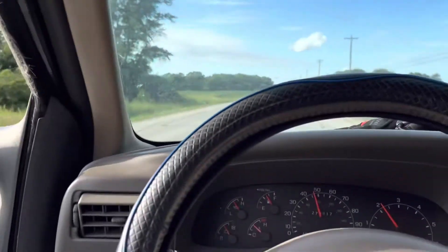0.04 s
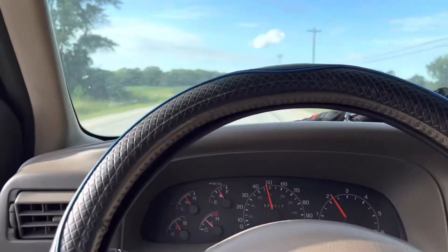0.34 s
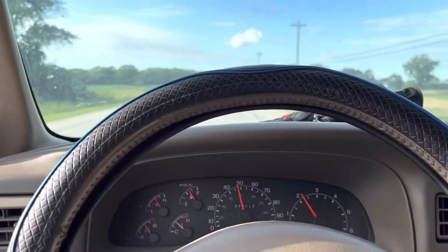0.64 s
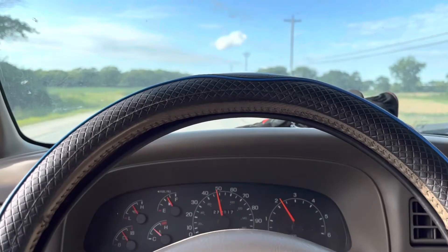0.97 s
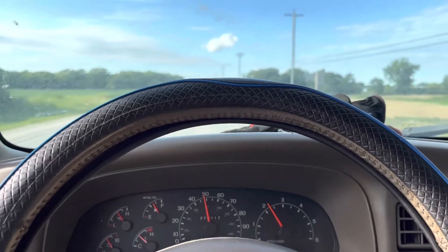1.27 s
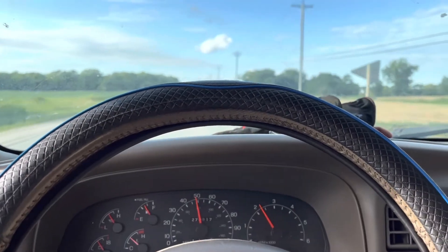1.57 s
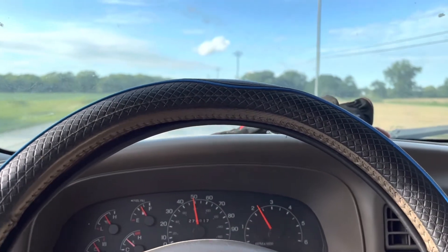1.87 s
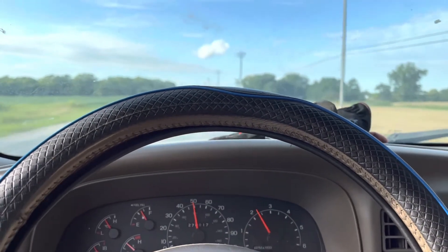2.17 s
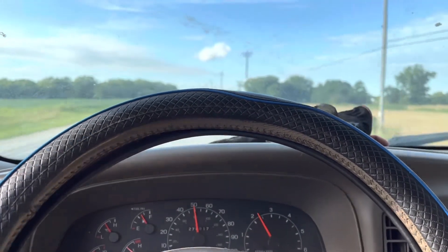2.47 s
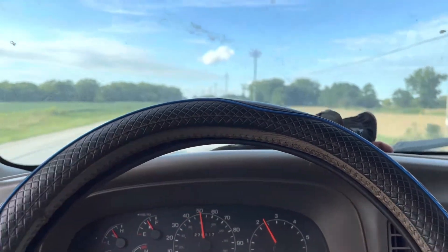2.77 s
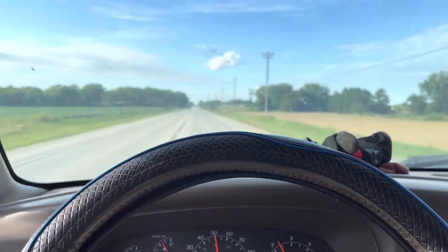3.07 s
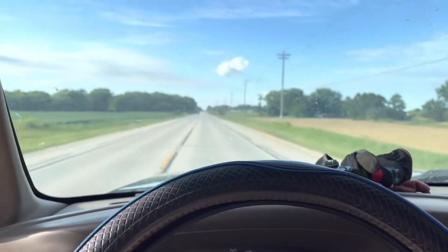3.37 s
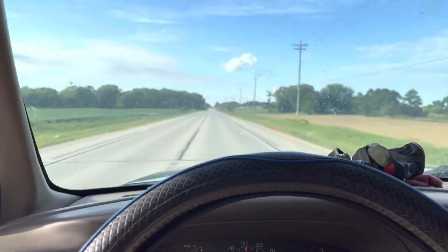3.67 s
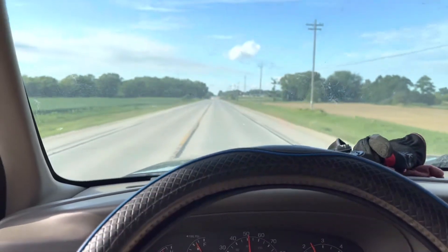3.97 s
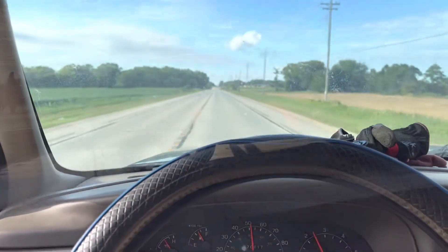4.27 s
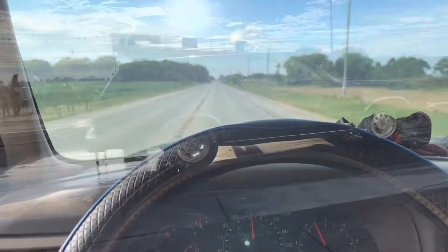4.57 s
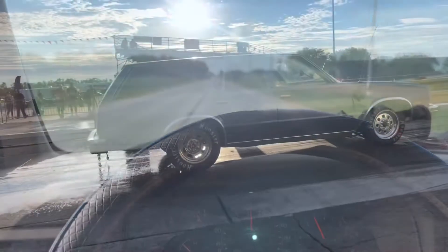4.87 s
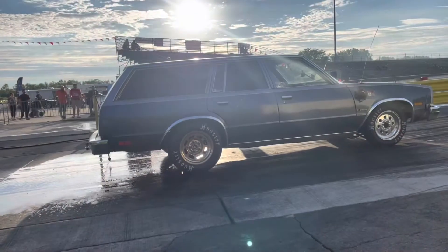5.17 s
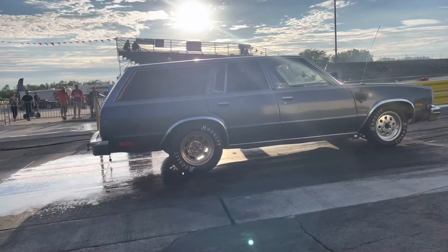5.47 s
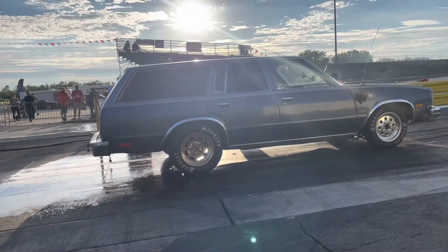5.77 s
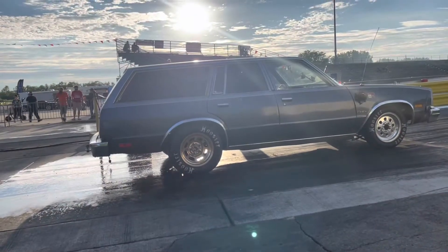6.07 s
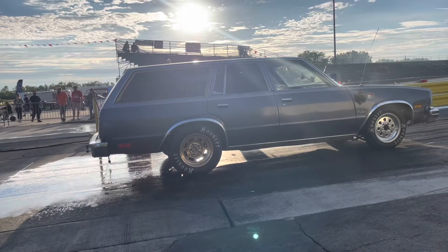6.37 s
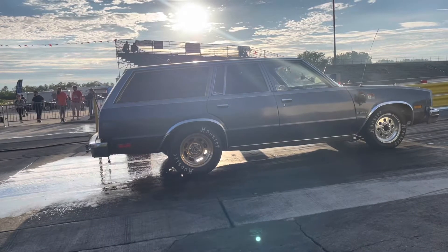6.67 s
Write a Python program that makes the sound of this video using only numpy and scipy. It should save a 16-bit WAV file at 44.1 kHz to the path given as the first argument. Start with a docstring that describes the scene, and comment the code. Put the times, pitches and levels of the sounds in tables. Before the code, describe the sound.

Inside a moving pickup, a diesel V8 drones and knocks, slowly gathering speed over road rumble, tyre roar, buzzing panels and light wind hiss. Past halfway it cross-fades to an outdoor drag strip, close beside a turbocharged V8 wagon held on its brakes. The exhaust lopes and rasps, fires a quick run of hard pops, and the turbo whistles upward in a bright hiss of air.

```python
"""Inside the cab of a pickup: the diesel V8 drones, knocks and slowly gathers speed over road rumble,
buzzing panels and wind at the glass. Cross-fade to a drag strip, microphone on a turbocharged V8 wagon
building boost against its brakes. Uneven surges ring its tailpipe into a loping bark and rasp,
unburnt fuel goes off in a run of hard pops, and the turbo whistles upward in a bright hiss of air."""
import sys
import numpy as np
from scipy import signal
from scipy.fft import rfft, irfft, next_fast_len
from scipy.io import wavfile

SR = 44100
rng = np.random.default_rng(int(sys.argv[2]) if len(sys.argv) > 2 else 0)


def transcribe(u):
    """Save the signal u as a 16-bit wav file named by the first command-line argument.

    u: samples, shape (n,) or (channels, n), limited to [-1, 1]; the rate is SR.
    q: integer samples, one column per channel.
    """
    v = np.clip(np.atleast_2d(u).T, -1, 1)
    q = np.round(v * 32767).astype(np.int16)
    wavfile.write(sys.argv[1], SR, q)


N = 301203
TIME = np.arange(N) / SR

# In the cab. Levels in all tables are relative; an order is a multiple of the four-stroke cycle rate.
# the pickup's weaker engine lines: order, level/dB at low revs, level/dB at high revs
TRUCK_ORDERS = [(6, -27.5, -30), (9, -35.5, -32), (11, -49, -28), (19, -54, -39), (23, -40, -38),
                (24, -40, -36), (27, -32.5, -48), (29, -33, -44), (32, -49, -26), (42, -52, -43),
                (43, -41, -50), (44, -52, -43), (50, -50, -45)]
# engine block resonances: f/Hz, width/Hz, level/dB
BLOCK_MODES = [(994, 15, 12.5), (1295, 33, 10), (1847, 29, 2), (2300, 36, 4), (2650, 69, -7)]
# cab panel resonances: f/Hz, width/Hz, level/dB
PANEL_MODES = [(295.4, 37, -31.5), (508, 53, -40), (761, 17, -38.5), (987, 15, -57.5)]
# body rumble: f/Hz, level/dB
RUMBLE_SPECTRUM = [(25, -31), (32, -9), (42, -4.5), (58, -3), (72, -11.5), (115, -7), (150, -11.5),
                   (200, -15.5), (260, -23.5)]
# the rumble swelling on rough patches of road: t/s, level/dB
ROUGH_ROAD = [(2.3, -1), (2.55, 2), (3.0, 0.5), (3.55, 0), (3.77, 3), (3.95, 0.5), (4.35, -0.5), (4.7, -1)]
# tyres, heard from inside: f/Hz, level/dB
TYRE_SPECTRUM = [(170, -18), (240, -13), (295, -1.5), (370, -10), (450, -8), (560, -8), (680, -10.5),
                 (950, -9), (1150, -12.5), (1400, -15), (1900, -20.5), (2600, -70)]
# wind at the glass: f/Hz, level/dB
WIND_SPECTRUM = [(1400, -22), (2200, 1.5), (3000, -3.5), (4400, -7.5), (5200, -7), (7000, -13),
                 (9000, -31.5), (11500, -14), (14000, -27.5), (15500, -20)]
# how alike left and right are in the cab: f/Hz, likeness (-1 to 1)
CAB_LIKENESS = [(60, 0.97), (130, 0.99), (280, 0.22), (600, -0.19), (1250, -0.99), (2700, 0.78),
                (6000, -0.29), (13000, 0.78)]

# At the strip. The wagon's engine speed: t/s, speed/rpm
RACER_RPM = [(4.5, 1861.5), (4.95, 2080.0), (5.15, 2225.0), (5.45, 2344.0), (5.8, 2417.0), (6.15, 2484.0),
             (6.4, 2588.0), (6.6, 2645.0), (6.83, 2690.0)]
ORDER_RPM, RASP_RPM = (2000, 2245, 2420, 2650), (2260, 2350, 2500)
# exhaust lines: order, then level/dB at each speed of ORDER_RPM
EXHAUST_ORDERS = [(3, -38, -40, -30, -23), (4, -35, -39, -39, -30), (5, -10, -10, -11, -11),
                  (6, -28, -30, -28, -29), (7, -25, -23, -20, -21), (8, -15.5, -17, -18, -17),
                  (9, -25, -24, -22, -20), (10, -24, -26, -25.5, -23), (11, -22, -26, -28, -40),
                  (12, -25, -26, -25, -23), (13, -26, -26, -27, -25), (14, -32, -34, -29.5, -31),
                  (15, -25, -33, -32, -40), (16, -33, -41, -40, -38), (17, -29, -40, -33, -33),
                  (18, -22.5, -24.5, -24, -26), (19, -32, -26.5, -28, -35), (20, -36, -39, -43, -45),
                  (21, -19.5, -38, -45, -47), (22, -31, -55, -41, -55), (23, -33, -36, -32, -55),
                  (24, -33, -33, -50, -55)]
# exhaust surges: place in the cycle (0-1), push/dB, bark/dB, then rasp/dB at each speed of RASP_RPM
PUFFS = [(.14, 0, 0, -24, -24, -27), (.34, -8, -2, -22, -23, -24), (.54, -1, -3, -23, -24, -29),
         (.73, -3, 1, -25, -19, -23), (.92, -4, -3, -18, -11.5, -20)]
# low tailpipe resonances: f/Hz, width/Hz, level/dB
BARK_MODES = [(689, 138, 3.5), (798, 206, -1), (896, 48, 0.5)]
# high tailpipe resonances: f/Hz, width/Hz, level/dB
RASP_MODES = [(1140, 120, 10.5), (1255, 157, 4.5), (1477, 150, -3), (1670, 110, -7.5), (1810, 550, -19),
              (2580, 260, -23), (2940, 180, -27)]
# hard pops in the exhaust: t/s, level/dB
POPS = [(4.746, 1.5), (4.807, 2.5), (4.866, 1.5), (4.981, -3), (5.037, 2), (5.092, 2), (5.147, 1.5),
        (5.2, 0), (5.253, .5), (5.306, -4.5), (5.358, -4)]
# resonances rung by a pop: f/Hz, width/Hz, level/dB
POP_MODES = [(1144, 166, 27), (1720, 190, -12), (2560, 850, -10)]
# the turbo's speed, heard as pitch: t/s, f/Hz
TURBO_PITCH = [(4.5, 2150), (5.2, 2300), (5.45, 2520), (5.65, 2830), (5.82, 3300), (6.13, 3850),
               (6.36, 3860), (6.5, 4050), (6.63, 4170), (6.71, 4680), (6.83, 4780)]
# the turbo's flow, surging and then holding: t/s, level/dB
TURBO_FLOW = [(4.6, -1), (4.8, 2.5), (4.95, -1), (5.35, .5), (5.83, .5), (5.9, -5), (6.07, -3), (6.14, 3.5),
              (6.3, -1), (6.45, 2.5), (6.62, 1), (6.72, 5), (6.83, 5)]
# broad rush against clean whistle, by turbo pitch: f/Hz, share of rush (0-1)
RUSH_SHARE = [(3000, .55), (3800, .35), (4150, .3), (4600, 1)]
# response of the intake duct: f/Hz, level/dB
INTAKE_DUCT = [(2000, -30), (2450, -31.5), (3250, -36.5), (3550, -39.5), (3880, -35), (4150, -34),
               (4350, -36), (4560, -30.5), (4760, -33.5), (5000, -29.5), (5500, -35)]
# colour of the rushing air: f/Hz, level/dB
AIR_SPECTRUM = [(620, 5.5), (800, 6.5), (1700, -1), (2500, -1.5), (3500, -5.5), (5200, -6.5), (6900, -12),
                (8000, -5.5), (9000, -3.5), (10200, 1.5), (11000, -5), (11800, -11.5), (13200, -35),
                (15000, -55)]
# strength of the rushing air: t/s, level/dB
AIR_LEVEL = [(5.25, -35.5), (5.92, -39.5), (6.238, -36.5), (6.7, -36.5)]
# a thin whine swelling and dying away: t/s, level/dB
WHINE_LEVEL = [(4.9, -70), (5.2, -53), (5.75, -55), (5.92, -45), (6.05, -48), (6.2, -80)]
# how alike left and right are at the strip: f/Hz, likeness (-1 to 1)
STRIP_LIKENESS = [(60, 0.055), (280, 0.058), (600, 0.59), (2700, 0.99), (6000, 0.86), (11000, 0.95)]
# the wagon's direction from the microphone: f/Hz, left minus right level/dB
STRIP_PAN = [(100, .4), (250, .4), (650, -2.2), (1180, -2), (2140, 1.8), (3880, 4), (7000, 1.5),
             (10000, .3)]
# lag between the microphone ports: f/Hz, lead of the left/rad
PORT_PHASE = [(150, 0), (600, -.5), (1120, -.25), (1720, -.5), (2100, 0), (6800, 0), (7800, .9),
              (8800, -.3), (10150, -3.14), (10900, -3.9), (11700, -6.2)]

TRUCK_START_RPM, TRUCK_RPM_PER_S = 1377.0, 31.3
TRUCK_RPM = TRUCK_START_RPM + TRUCK_RPM_PER_S * TIME


def truck_engine(pedal_s=.79, boom_hz=198.3, boom_width_hz=14.6):
    """Eight firings a cycle drone through the cab; twice that rate climbs into its air resonance."""
    turn = cycles(TRUCK_RPM)
    climb = (TRUCK_RPM - TRUCK_RPM.min()) / np.ptp(TRUCK_RPM)
    drone = from_db(-19.5 - 7 * np.maximum(1 - TIME / pedal_s, 0))  # comes up as the pedal goes down
    detuning = 2 * (16 * TRUCK_RPM / 120 - boom_hz) / boom_width_hz
    boom = from_db(-19.5) / np.sqrt(1 + detuning ** 4)
    out = drone * wavering_line(turn, 8, waver_db=1, waver_turns=.01, rate_hz=6)
    out += boom * wavering_line(turn, 16, waver_db=1, waver_turns=.01, rate_hz=6)
    for order, low_db, high_db in TRUCK_ORDERS:
        line = wavering_line(turn + rng.random(), order, waver_db=2, waver_turns=.023, rate_hz=1.8)
        out += from_db(low_db + (high_db - low_db) * climb) * line
    return out


def racer(no_boost_hz=1920, full_boost_hz=4500):
    """The wagon held on its brakes: the exhaust follows the revs, boost follows the turbo's speed."""
    rpm, turbo_hz = in_time(RACER_RPM), in_time(TURBO_PITCH)
    turn = cycles(rpm)
    boost = np.clip((turbo_hz - no_boost_hz) / (full_boost_hz - no_boost_hz), 0, 1)
    exhaust = bark_and_rasp(turn, rpm, boost) + exhaust_roar() + exhaust_note(turn, rpm) + pops()
    return exhaust + reflections(rushing_air(turn)) + ticks(turn, boost) + turbo(turbo_hz) + whine()


def exhaust_note(turn, rpm, lead_cycles=.017):
    """The low pressure wave in the pipe: orders line up with the surges and trade strength with revs."""
    out = 0
    for order, *levels_db in EXHAUST_ORDERS:
        push = sum(from_db(db) * np.exp(-2j * np.pi * order * (place - lead_cycles))
                   for place, db, *_ in PUFFS)
        aligned = turn + np.angle(push) / (2 * np.pi * order)
        line = wavering_line(aligned, order, .09 * order ** .8, waver_turns=.001 * order, rate_hz=12)
        out += from_db(np.interp(rpm, ORDER_RPM, levels_db)) * line
    return out


def bark_and_rasp(turn, rpm, boost, bark_lead_cycles=.015):
    """Each surge rings the pipe twice: a low bark that grows with boost, then a higher rasp."""
    bark_fronts = surges(turn + bark_lead_cycles, [row[2] for row in PUFFS])
    rasp_fronts = surges(turn, [np.interp(rpm, RASP_RPM, row[3:]) for row in PUFFS])
    bark = tailpipe(bark_fronts, BARK_MODES, turbulence=.16, puff_s=.002, spread=1.5)
    rasp = tailpipe(rasp_fronts, RASP_MODES, turbulence=.24, puff_s=.003, spread=.7)
    return from_db(-30 + 1.6 * boost) * bark + from_db(-30) * rasp


def surges(turn, strengths_db, scatter_db=1.3):
    """The sharp front of every exhaust surge, each a little different in strength."""
    fronts = np.zeros(N)
    for (place, *_), db in zip(PUFFS, strengths_db):
        at = np.flatnonzero(np.diff(np.floor(turn - place)))
        fronts[at] = from_db(np.broadcast_to(db, N)[at] + scatter_db * rng.standard_normal(len(at)))
    return fronts


def tailpipe(fronts, modes, turbulence, puff_s, spread):
    """Each front drags a dying burst of turbulence behind it; both ring the tailpipe."""
    burst = decay(fronts + 1e-18, puff_s)
    gas = rng.standard_normal(N) + spread * rng.standard_normal((2, N))
    drive = rms_one(fronts) + turbulence * rms_one(burst * gas)
    rung = sum((-1) ** i * from_db(db) * resonate_twice(drive, hz, width)
               for i, (hz, width, db) in enumerate(modes))
    low_cut = signal.butter(2, modes[0][0] * 2.55, "high", fs=SR, output="sos")
    return rms_one(signal.sosfilt(low_cut, rung))


def pops():
    """Unburnt fuel goes off in the pipe: hard cracks while boost is still low."""
    times_s, db = np.transpose(POPS)
    fronts = np.zeros(N)
    fronts[(times_s * SR).astype(int)] = from_db(db)
    return from_db(-37) * tailpipe(fronts, POP_MODES, turbulence=.2, puff_s=.003, spread=.5)


def exhaust_roar():
    """Steady low noise under the exhaust note."""
    spectrum = [(34, -24), (70, -22), (130, -22), (360, -29), (430, -21.5)]  # f/Hz, level/dB
    return from_db(-32) * stereo_noise(spectrum, STRIP_LIKENESS)


def turbo(pitch_hz, flutter_db=1.5):
    """The compressor spools up through its duct: a rough rush, a breathy whistle, hiss at top speed."""
    share = at_hz(RUSH_SHARE, pitch_hz)
    whistle = np.sqrt(1 - share) * noise_band(pitch_hz, half_width_hz=200)
    rush = np.sqrt(share) * noise_band(pitch_hz, half_width_hz=440)
    flow = from_db(-2 + in_time(TURBO_FLOW) + flutter_db * drift(32))
    return filtered(flow * (whistle + rush), lambda hz: from_db(at_hz(INTAKE_DUCT, hz)))


def rushing_air(turn, throb_db=.9, flicker_db=2):
    """A bright hiss of air that flickers and throbs once an engine cycle."""
    unsteady_db = throb_db * np.cos(2 * np.pi * turn) + flicker_db * drift(87)
    return from_db(in_time(AIR_LEVEL) + 9 + unsteady_db) * stereo_noise(AIR_SPECTRUM, STRIP_LIKENESS)


def cab_noise():
    """All around the microphone: the road shakes the body, tyres roar, wind hisses. All grow with speed."""
    faster = (TRUCK_RPM - TRUCK_START_RPM) / 100  # hundreds of rpm gained
    rumble = from_db(-18.5 + .85 * faster + in_time(ROUGH_ROAD))
    rumble = rumble * stereo_noise(RUMBLE_SPECTRUM, CAB_LIKENESS)
    tyres = from_db(-28 + .47 * faster + drift(11)) * stereo_noise(TYRE_SPECTRUM, CAB_LIKENESS)
    wind = from_db(-43.5 + 2 * faster + .5 * drift(22)) * stereo_noise(WIND_SPECTRUM, CAB_LIKENESS)
    return rumble + tyres + wind


def cab_panels(engine_share=.55):
    """Road noise through the floor and the engine's climbing high orders ring the panels."""
    road = stereo_noise([(200, .017), (1000, .015)], CAB_LIKENESS)  # f/Hz, level/dB
    place = np.linspace(0, 1, 4096)
    one_cycle = sum(np.sin(2 * np.pi * (order * place + rng.random())) for order in range(17, 90))
    buzz = rms_one(np.interp(cycles(TRUCK_RPM) % 1, place, one_cycle))
    drive = np.sqrt(1 - engine_share) * road + np.sqrt(engine_share) * buzz
    return sum(from_db(db) * rms_one(resonate(drive, hz, width)) for hz, width, db in PANEL_MODES)


def diesel_clatter(rise_db_per_s=.88, knock_s=.0083, uneven_db=3):
    """Every firing knocks on the block, each cylinder with its own strength, harder as load builds."""
    firing = np.floor(8 * cycles(TRUCK_RPM)).astype(int)
    at = np.flatnonzero(np.diff(firing))
    cylinders = rng.uniform(-.72, 1, size=8)
    knocks = np.zeros(N)
    knocks[at] = from_db(uneven_db * (cylinders[firing[at] % 8] + rng.uniform(-.82, 1, len(at))))
    rattle = decay(knocks, knock_s) * rng.standard_normal((2, N))
    block = sum(from_db(db) * resonate(rattle, hz, width) for hz, width, db in BLOCK_MODES)
    return from_db(-43 + rise_db_per_s * TIME) * rms_one(block)


def ticks(turn, boost, ping_peak_s=5.23, ping_swell_s=.14):
    """Metallic ticks once a cycle: a high ping as the pops end, a lower ring that grows with boost."""
    def ring(place, hz):
        clicks = np.diff(np.floor(turn - place), prepend=-1) + 1e-18
        return rms_one(resonate_twice(clicks, hz, width_hz=280))
    swell = np.exp(-((TIME - ping_peak_s) / ping_swell_s) ** 2)
    ping = from_db(-37) * swell * ring(place=.94, hz=3050)
    return ping + from_db(-38.5) * boost * ring(place=.33, hz=1980)


def whine(hz=4340):
    """A faint narrow tone that hangs above the exhaust."""
    tone = wavering_line(hz * TIME, 1, waver_db=2, waver_turns=.3, rate_hz=12)
    return from_db(in_time(WHINE_LEVEL)) * tone


def reflections(x, echo_db=-11, delays_s=(.002, .0048)):
    """Close by, the wet track and the car's flank return the sound a little late and comb it."""
    def comb(hz):
        return 1 + from_db(echo_db) * sum(np.exp(-2j * np.pi * hz * s) for s in delays_s)
    return filtered(x, comb)


def at_microphone(x):
    """Sound from one side reaches the two microphone ports with unlike level and phase."""
    sides = np.array([[.5], [-.5]])
    def ports(hz):
        return from_db(sides * at_hz(STRIP_PAN, hz)) * np.exp(1j * sides * at_hz(PORT_PHASE, hz))
    return filtered(x, ports)


def cycles(rpm):
    """Four-stroke cycles completed: one for every two turns of the crank."""
    return np.cumsum(rpm) / (120 * SR)


def wavering_line(turn, order, waver_db, waver_turns, rate_hz):
    """One harmonic of a rotation, unsteady in strength and timing; rms near 1."""
    strength = np.sqrt(2) * from_db(waver_db * drift(rate_hz))
    return strength * np.sin(2 * np.pi * (order * turn + waver_turns * drift(rate_hz)))


def stereo_noise(spectrum, likeness):
    """Coloured noise at the two ports, falling steeply beyond the ends of its spectrum; rms 1."""
    def colour(hz, weight):
        skirts = np.minimum(hz / spectrum[0][0], 1) * np.minimum(spectrum[-1][0] / hz, 1)
        share = np.sqrt(1 + weight * at_hz(likeness, hz))
        return from_db(at_hz(spectrum, hz)) * skirts ** 4 * share
    mid = filtered(rng.standard_normal(N), lambda hz: colour(hz, .55))
    side = filtered(rng.standard_normal(N), lambda hz: colour(hz, -1))
    return rms_one(np.array([mid + side, mid - side]))


def noise_band(hz, half_width_hz, spread=.097):
    """A narrow band of stereo noise riding on a moving pitch; rms 1."""
    white = rng.standard_normal((2, 1, N)) + spread * rng.standard_normal((2, 2, N))
    in_phase, quadrature = signal.sosfilt(signal.butter(2, half_width_hz, fs=SR, output="sos"), white)
    angle = 2 * np.pi * np.cumsum(hz) / SR
    return rms_one(in_phase * np.cos(angle) + quadrature * np.sin(angle))


def drift(rate_hz, hop=40):
    """A smooth random wander; rms near 1."""
    r = np.exp(-2 * np.pi * hop * rate_hz / SR)
    slow = signal.lfilter([1], [1, -2 * r, r * r], rng.standard_normal(N // hop + 2002))[2000:]
    return np.interp(np.arange(N) / hop, np.arange(len(slow)), rms_one(slow))


def resonate(x, hz, width_hz):
    """A resonance with gain 1 at its peak."""
    r = np.exp(-np.pi * width_hz / SR)
    feedback = [1, -2 * r * np.cos(2 * np.pi * hz / SR), r * r]
    return signal.lfilter(np.array([1, 0, -1]) * (1 - r * r) / 2, feedback, x)


def resonate_twice(x, hz, width_hz):
    """Two like resonances in series: a softer onset and steeper skirts."""
    return resonate(resonate(x, hz, width_hz), hz, width_hz)


def decay(impulses, decay_s):
    """Give each impulse an exponential tail."""
    return signal.lfilter([1], [1, -np.exp(-1 / (decay_s * SR))], impulses)


def filtered(x, response):
    """Apply a response given as a function of Hz."""
    size = next_fast_len(N + 8192)
    hz = np.maximum(np.arange(size // 2 + 1) * SR / size, 1)
    return irfft(rfft(x, size) * response(hz), size)[..., :N]


def in_time(points):
    """Read a curve at every sample."""
    return np.interp(TIME, *np.transpose(points))


def at_hz(points, hz):
    """Read a spectrum on a log-frequency axis."""
    f, value = np.transpose(points)
    return np.interp(np.log(hz), np.log(f), value)


def from_db(db):
    """Decibels to gain."""
    return 10 ** (np.asarray(db) / 20)


def rms_one(x):
    """Scale to rms 1."""
    return x / np.sqrt(np.mean(x ** 2) + 1e-20)


def scene(fade_start_s=4.255, fade_out_s=1, fade_in_s=.91):
    """The cab fades out as the strip fades in."""
    since = TIME - fade_start_s
    cab_fade = np.clip(1 - since / fade_out_s, 0, 1) ** .76  # a power under 1 lets the cab linger
    strip_fade = np.clip(since / fade_in_s, 0, 1)
    cab = truck_engine() + diesel_clatter() + cab_noise() + cab_panels()
    return cab_fade * cab + strip_fade * at_microphone(racer())


def record(dry):
    """Behind the microphone, the highest peaks are rounded and the top treble is cut."""
    rounded = dry / (1 + (dry / .95) ** 10) ** (1 / 10)
    high_cut = signal.cheby2(14, 60, 15200, fs=SR, output="sos")
    return signal.sosfilt(high_cut, rounded)


dry = scene()
out = record(dry)
transcribe(out)
```